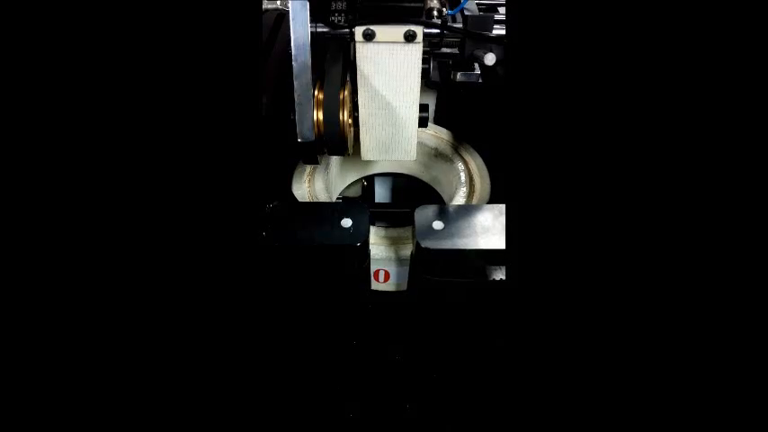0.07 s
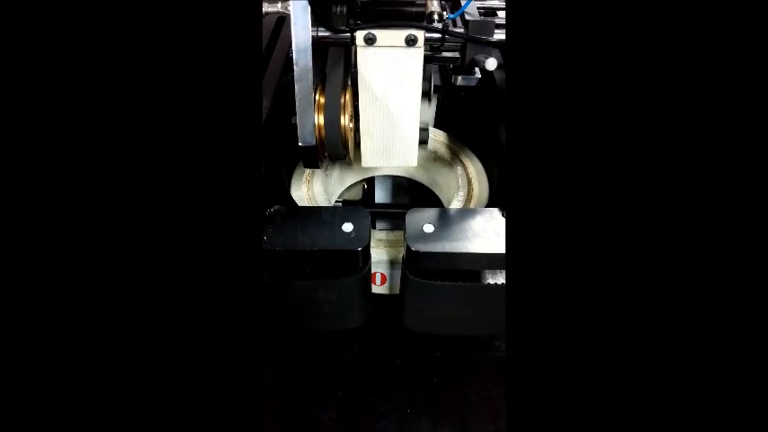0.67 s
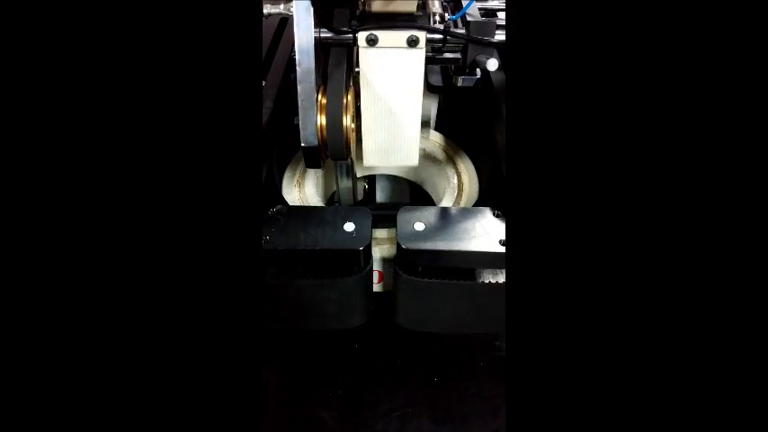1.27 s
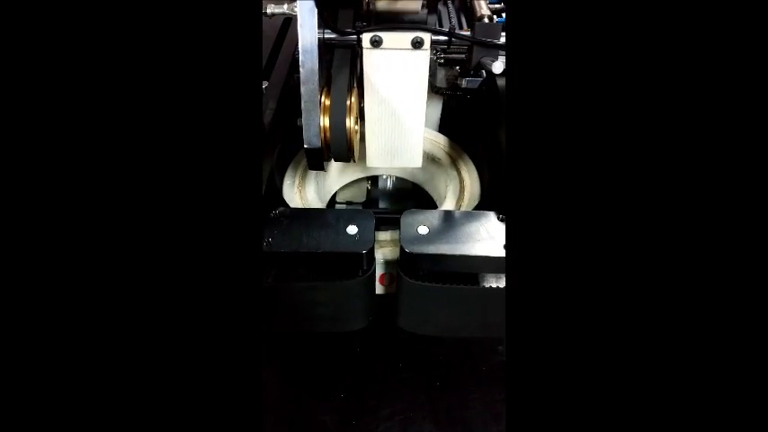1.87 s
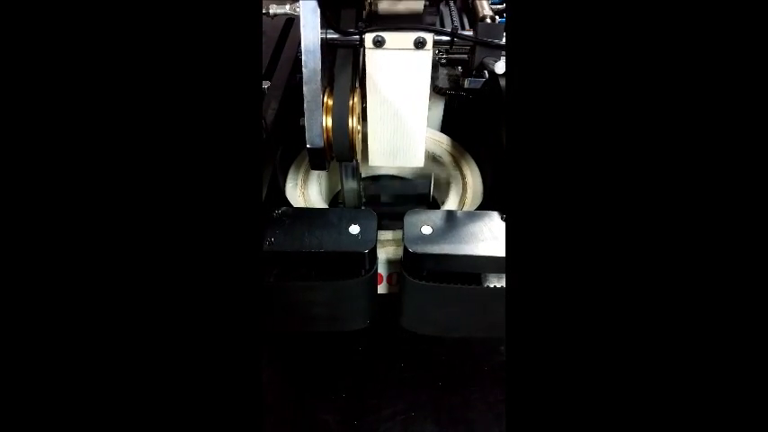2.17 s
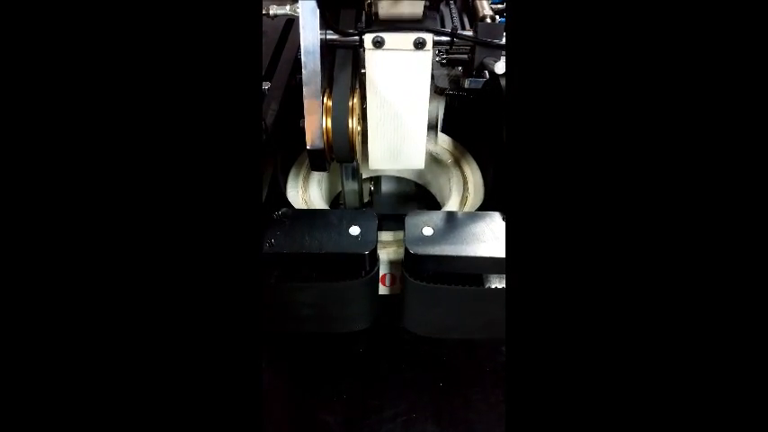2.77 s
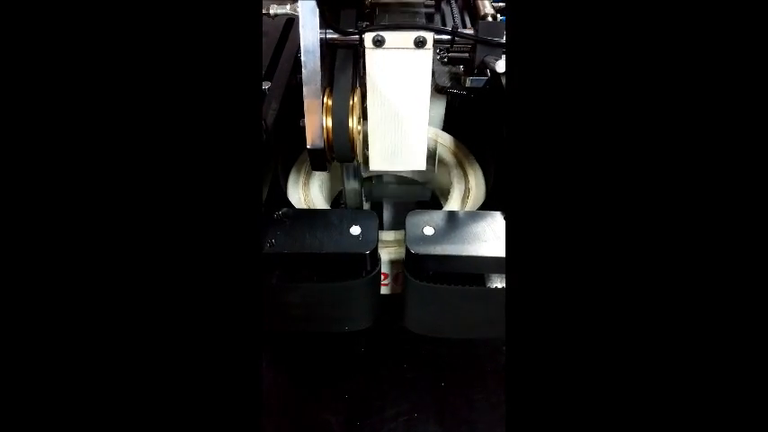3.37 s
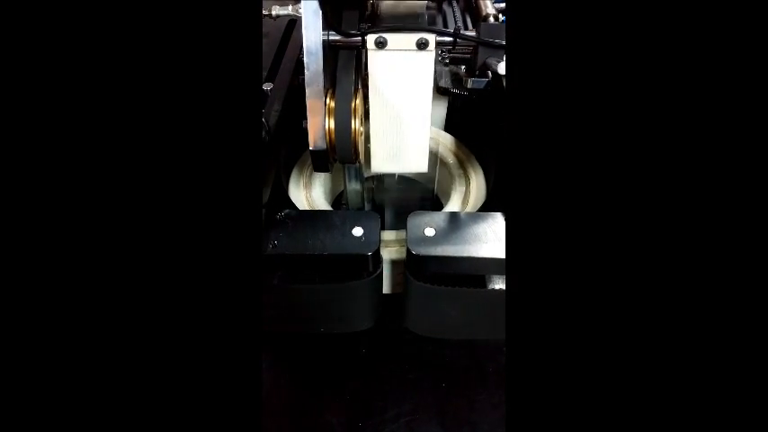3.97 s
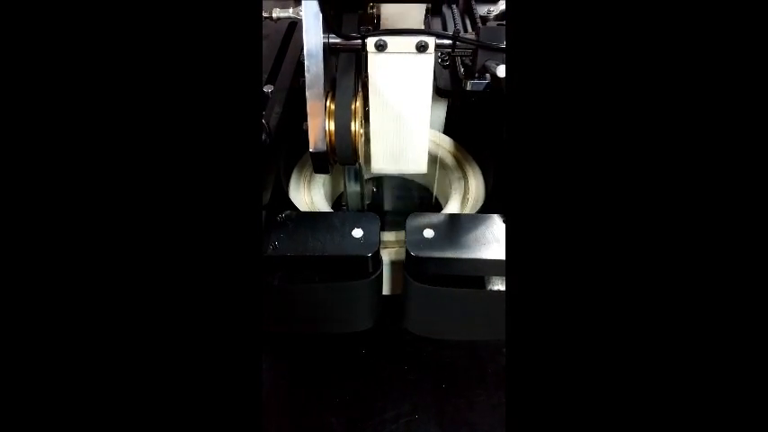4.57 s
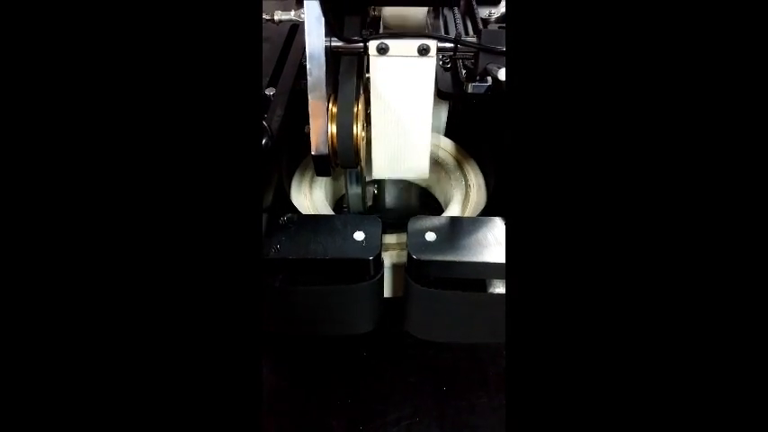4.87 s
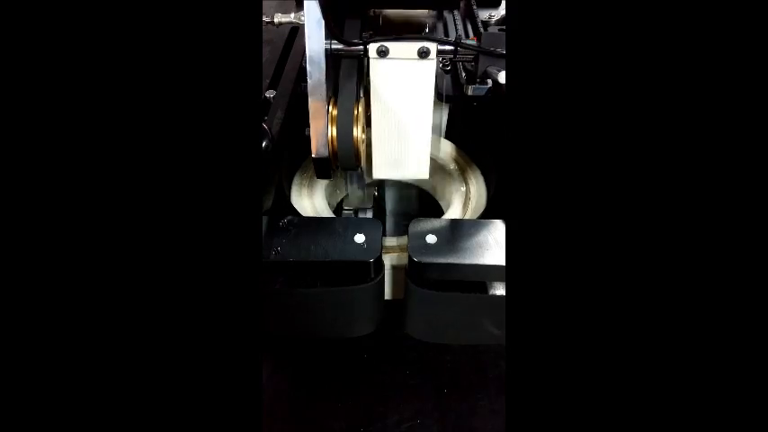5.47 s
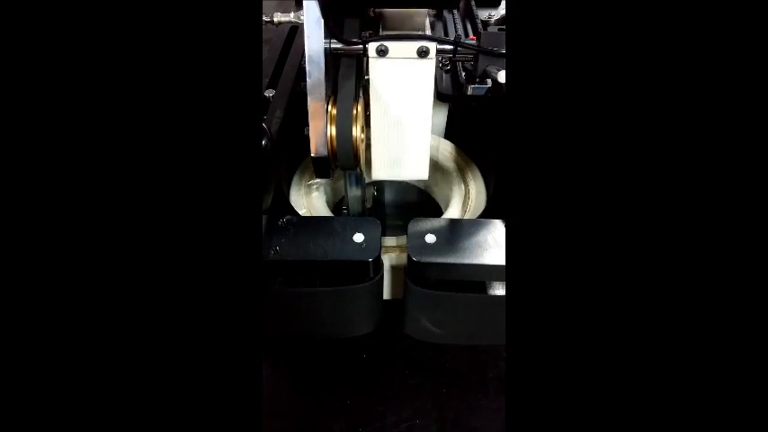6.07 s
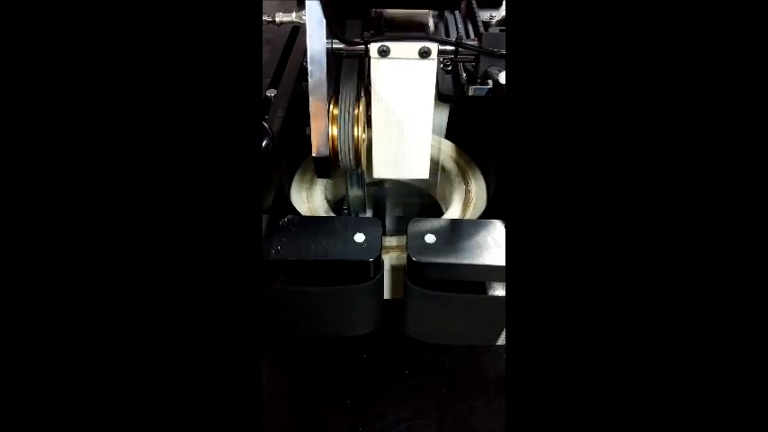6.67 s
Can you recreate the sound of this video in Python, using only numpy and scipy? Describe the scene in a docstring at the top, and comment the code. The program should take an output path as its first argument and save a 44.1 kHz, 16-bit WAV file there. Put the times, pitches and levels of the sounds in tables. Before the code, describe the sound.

Sticky tape peels in squealing bursts, then rasps steadily as a coil wrapping machine speeds up, rumbling and rattling.

```python
"""Tape peels off the reel of a coil wrapping machine, close by, as its glue sticks and slips: first in
squawking, crackling tugs, then, at speed, in a rasp that swells twice a turn. The shuttle ring that
pulls it runs on rollers, whose small impacts excite the modes of the ring, while the steel frame
rumbles and the sheet guards rattle. Behind them the motor hums, the pneumatics hiss faintly
and the hall reverberates with the sound of the tape."""
import sys
import numpy as np
from scipy import signal
from scipy.fft import rfft, irfft, next_fast_len
from scipy.io import wavfile
from scipy.ndimage import uniform_filter1d, map_coordinates

SR = 44100
rng = np.random.default_rng(int(sys.argv[2]) if len(sys.argv) > 2 else 0)


def unload_wav(signal):
    """Save mono or channel-first audio to the path in sys.argv[1] as 16-bit WAV at rate SR, clipped to [-1, 1]."""
    wavfile.write(
        sys.argv[1],
        SR,
        np.round(np.clip(np.atleast_2d(signal).T, -1, 1) * 32767).astype(np.int16),
    )


N = 296352
TIME = np.arange(N) / SR
START_S, TURN_S = 0.656, 0.388  # onset of the sound; period of the ring at full speed
TAPE_LAG_MS = 0.476  # the tape is heard on the left first
TUG_FALL_S = 0.075


def amp(db):
    """Decibels to amplitude ratio."""
    return 10 ** (np.asarray(db) / 20)


def unit(x):
    """Normalisation to rms 1."""
    return x / np.sqrt(np.mean(x ** 2) + 1e-20)


def along(points, hz):
    """Interpolation of (frequency, value) points on a logarithmic frequency axis."""
    freqs, values = np.transpose(points)
    return np.interp(np.log(hz + 1), np.log(freqs + 1), values)


def curves(rows, period=None):
    """Linear interpolation in time: one curve for each column after the first."""
    times, *columns = np.transpose(rows)
    return [np.interp(TIME, times, column, period=period) for column in columns]


def swells(rows, fall_s, late_s=0):
    """Trapezoidal envelopes, 0-1, one for each (time, rise, hold, ...) row."""
    t = TIME - late_s
    ramps = [np.minimum((t - s) / rise, 1 - (t - s - rise - hold) / fall_s) for s, rise, hold, *_ in rows]
    return np.clip(ramps, 0, 1)


def lifts(rows, fall_s, late_s=0):
    """Superposition of those envelopes, weighted by each column after the hold."""
    return np.transpose(rows)[3:] @ swells(rows, fall_s, late_s)


def wobble(rate):
    """Slow random modulation: a spline through rate knots a second."""
    return map_coordinates(rng.standard_normal(N // 8), [TIME * rate], mode="wrap")


def grains(rate, spread_db):
    """A Poisson process: rate tiny impulses a second, of scattered size and sign."""
    sizes = amp(spread_db * np.clip(rng.standard_normal(N), -2, 2)) * np.sign(rng.standard_normal(N))
    return sizes * (rng.random(N) < rate / SR)


def filtered(x, response):
    """Linear filtering: the spectrum of x times a frequency response."""
    size = 2 * next_fast_len(N // 2 + SR // 4)
    return irfft(rfft(x, size) * response(np.fft.rfftfreq(size, 1 / SR)), size)[..., :N]


def coloured(x, spectrum):
    """Minimum-phase filtering: folding the cepstrum makes the response causal."""
    def response(hz):
        cepstrum = irfft(np.log(amp(along(spectrum, hz))))
        cepstrum[1:len(cepstrum) // 2] *= 2
        cepstrum[len(cepstrum) // 2 + 1:] = 0
        return np.exp(rfft(cepstrum))
    return filtered(x, response)


def resonate(x, modes):
    """Modal superposition: (frequency, bandwidth, gain) resonators of alternating sign."""
    def response(hz):
        return sum((-1) ** k * amp(db) * 1j * hz * width / (centre ** 2 - hz ** 2 + 1j * hz * width)
                   for k, (centre, width, db) in enumerate(modes))
    return filtered(x, response)


def steadied(x, seconds):
    """Division by the running rms evens out the swells of a texture and leaves its grain."""
    power = np.abs(uniform_filter1d(np.mean(unit(x) ** 2, axis=0), int(seconds * SR)))
    return unit(x / np.sqrt(power + 0.017))


def lagged(x, lag_ms):
    """Interaural delay: the sound reaches the right side after the left."""
    return np.array([x, np.roll(x, round(lag_ms * SR / 1000))])


def panned(pair, pan_db):
    """Level panning: the left side stands pan_db above the right."""
    return pair * amp([[pan_db / 2], [-pan_db / 2]])


def spread(make, lag_ms, apart_db, pan_db):
    """Partial coherence of a wide source: one common signal plus an independent one on each side."""
    common = lagged(make(), lag_ms)
    return panned(common + amp(apart_db) * np.array([make(), make()]), pan_db)


def scattered(clicks, pan_db, scatter_db, t60):
    """Scattering by the moving machine: each click of the tape trails a fresh splash of noise."""
    decay = amp(-120 * np.arange(SR // 12) / SR / t60)  # of power, hence 120
    power = np.abs(signal.fftconvolve(clicks ** 2, decay / decay.sum())[:N])
    splash = np.sqrt(power) * rng.standard_normal((3, N))
    direct = lagged(clicks + splash[2], TAPE_LAG_MS)
    return panned(direct + amp(scatter_db) * splash[:2], pan_db)


# The ring settles into even turns: (time [s], modulation depth [0-1])
EVENNESS = [(3.95, 0), (4.3, 0.7)]
# One even turn: (time into the turn [s], tape pull [dB], guards [dB], rollers [dB], motor load [dB])
TURN_CYCLE = [(.03, 1.5, 0, 3, -10), (.115, 4, 3.5, -1, 6), (0.182, -1.5, -1.5, 3.9, -4),
              (.23, 6.5, 7, -2.5, 1.5), (.27, 3.5, 2, -1, 2), (.32, 0, -12.5, 3.5, -11.5),
              (.37, 0.5, 2, 1, -3.5)]
def turn_db(part):
    """Periodic modulation: each turn draws the tape gently, then hard; the rollers run freest between."""
    swings = dict(zip(["pull", "guards", "rollers", "motor"], curves(TURN_CYCLE, TURN_S)))
    return curves(EVENNESS)[0] * swings[part]


# Lurches of the ring: (time [s], rise [s], hold [s], then the lift of
# rumble [dB], rollers [dB], guards [dB], rasp [dB], crackle [dB])
RING_LURCHES = [(1.0, 0.021, 0.02, 5, -0.5, 6.5, 2, 0), (1.15, 0.053, 0.018, 10.5, -1.5, 1, 0.5, -3),
                (1.54, 0.034, 0.046, 10, 1.5, -1, 4.5, 11), (1.9, 0.015, 0.061, 5.5, 0.5, 7, 1.5, 2),
                (2.1, 0.017, 0.018, -2, 2.5, 7.5, 3.5, -1), (2.38, .02, 0.018, 2, 4, 6, 4.5, 3.5),
                (3.445, .015, 0.033, 10.5, 2.5, 1, 0.5, 10), (3.66, 0.033, 0.026, 4, 0, 5.5, -0.5, -0.5),
                (3.87, 0.02, .03, 5, 2, 5.5, 1.5, -2.5), (4.5, .02, 0.019, 6, -0.5, 0, 1, 2),
                (4.82, .03, 0.026, 9, -0.5, 1.5, -1.5, -0.5), (5.49, 0.026, 0.028, 4, -0.5, 1.5, 1.5, -1.5)]
def lurch_db(part):
    """Common modulation: a lurch of the ring briefly shifts the levels of several parts together."""
    column = ["rumble", "rollers", "guards", "rasp", "crackle"].index(part)
    return lifts(RING_LURCHES, fall_s=0.057)[column]


# Tugs on the tape: (time [s], rise [s], hold [s], rasp lift [dB], crackle lift [dB], slip lift [dB],
# guard lift [dB], rumble drop [dB], roller drop [dB], squawk level [dB])
TAPE_TUGS = [(1.234, .012, 0.12, 11.5, 6, 17.5, 9, 7, 0.5, -20.5),
             (1.675, .02, .2, 6.5, 7, 15, 4, 3, 0.5, -20.5), (2.6, .13, .09, 8, 5, 13.5, 10, 0, 0.5, -20.5),
             (3.89, 0.048, 0.12, 2.5, 3.5, 3.5, 4.5, 0.5, 6.5, -19.5)]
def tug_db(part, late_s=0):
    """Transient loading: a tug makes the peeling louder and holds the ring back."""
    column = ["rasp", "crackle", "slip", "guards", "rumble", "rollers"].index(part)
    return lifts(TAPE_TUGS, TUG_FALL_S, late_s)[column]


# The tape creeps off the reel, then runs freely: (time [s], relative rasp [dB], relative crackle [dB])
TAPE_FEED = [(.66, -34.5, -35), (.85, -35, -36.5), (1.0, -31.5, -30.5), (1.22, -35, -34.5),
             (1.5, -34, -35.5), (1.66, -30, -36.5), (2.05, -33, -34), (2.28, -34, -34.5),
             (2.88, -32.5, -32), (3.04, -31, -30), (3.2, -33, -33.5), (3.41, -36.5, -32),
             (3.48, -26, -32.5), (3.76, -25.5, -27), (3.86, -30, -27.5), (4.15, -26, -24.5),
             (5.15, -25, -25), (6.72, -26, -29)]
def peel_db():
    """Gains add in decibels: feed, tugs, lurches and turns set the rasp and the crackle."""
    rasp_db, crackle_db = curves(TAPE_FEED)
    rasp_db += tug_db("rasp") + lurch_db("rasp") + turn_db("pull")
    crackle_db += tug_db("crackle") + lurch_db("crackle") + 0.083 * turn_db("pull")
    return rasp_db, crackle_db


# Decay of the hall: (frequency [Hz], reverberation time [s])
HALL_T60 = [(150, 0.38), (1500, 0.59), (6000, 0.089), (15000, 0.05)]
def hall(x):
    """Reverberation: convolution with noise that decays exponentially, each band at its own rate."""
    hz, t, noise = signal.stft(rng.standard_normal((2, SR // 2)), SR, nperseg=256)
    decay = amp(-60 * t / along(HALL_T60, hz)[:, None])
    tail = signal.istft(noise * decay, SR, nperseg=256)[1]
    return signal.fftconvolve(x, tail / np.linalg.norm(tail[0]), axes=1)[:, :N]


# Resonances of the air outlet: (frequency [Hz], bandwidth [Hz], gain [dB])
OUTLET_MODES = [(3620, 100, -2.5), (3900, 580, -4.5), (6680, 89, 1), (6800, 260, -21), (6900, 630, -3.5)]
# Puffs of escaping air: (time [s], rise [s], hold [s], lift [dB])
AIR_PUFFS = [(.64, 0.014, .03, 18), (.85, 0.067, 0.062, 21.5), (1.56, 0.043, .02, 22.5),
             (2.9, .06, .05, 14), (3.25, 0.1, .03, 15)]
# Spectrum of the valve's spit: (frequency [Hz], gain [dB])
SPIT_SPECTRUM = [(4000, -30), (6800, -15), (8300, 2), (8900, -9), (10000, -5), (12500, -10), (16000, -12)]
def air():
    """Jet noise: a leak hisses through the outlet's resonances, and a switching valve spits once."""
    leak_db = -47.5 + lifts(AIR_PUFFS, fall_s=0.31)[0]
    hiss = amp(leak_db) * unit(resonate(rng.standard_normal((2, N)), OUTLET_MODES))
    age = TIME - 1.043
    burst = amp(-10.5 - 60 * np.abs(age) / 0.028)
    tail = amp(-20.5 - 60 * np.abs(age) / 0.26)
    spit = unit(coloured(rng.standard_normal((2, N)), SPIT_SPECTRUM))
    return hiss + (age > 0) * (burst + tail) * spit


# Band of the whine: (frequency [Hz], bandwidth [Hz], gain [dB])
WHINE_BAND = [(3490, 83, 0)]
# Its swell: (time [s], rise [s], hold [s], level [dB])
WHINE_ENVELOPE = [(2.8, .15, .45, -41)]
def whine():
    """Narrow-band noise is heard as a pitch: a thin whine in the lull before the ring speeds up."""
    level = amp(np.transpose(WHINE_ENVELOPE)[-1]) @ swells(WHINE_ENVELOPE, fall_s=0.31)
    return level * unit(resonate(rng.standard_normal((2, N)), WHINE_BAND))


# Partials of the motor's hum: (frequency [Hz], relative level [dB])
HUM_PARTIALS = [(59.3, -10), (119, -0.5), (240.5, -3), (356, -6.5)]
# The motor takes up its load: (time [s], relative level [dB])
MOTOR_LOAD = [(.66, -32), (.73, -40), (.78, -27), (.97, -16.5), (1.2, -32), (1.57, -22.5), (1.85, -27.5),
              (2.2, -20), (2.6, -32), (2.9, -25), (3.3, -22), (3.62, -24), (3.8, -18), (4.0, -27),
              (4.3, -22.5), (6.72, -22)]
def motor():
    """A line spectrum: near-harmonic partials waver in level and phase and swell with the load."""
    hum = np.zeros(N)
    for hz, db in HUM_PARTIALS:
        peak = np.sqrt(2) * amp(db + 0.67 * wobble(9.6))
        hum += peak * np.sin(2 * np.pi * hz * TIME + 0.97 * wobble(12))
    return amp(curves(MOTOR_LOAD)[0] + turn_db("motor") - 0.5) * hum


# Response of the steel frame: (frequency [Hz], gain [dB])
FRAME_SPECTRUM = [(15, -13), (30, -33), (42, -16), (56, -9.5), (95, -7.5), (160, -15.5), (260, -13.5),
                  (600, -51)]
def frame():
    """Structure-borne sound: random contacts shake the frame into a low rumble."""
    shake = spread(lambda: grains(900, 6.4), lag_ms=0.13, apart_db=-11, pan_db=0)
    level_db = -26 + lurch_db("rumble") - tug_db("rumble")
    return amp(level_db) * steadied(coloured(shake, FRAME_SPECTRUM), 0.1)


# Resonances of the sheet guards: (frequency [Hz], bandwidth [Hz], gain [dB])
GUARD_MODES = [(563, 107, -2.5), (630, 40, 1), (648, 17.6, 3), (763, 71, 2.5), (868, 59, -6.5)]
def guards():
    """Forced vibration of plates: the guards rattle with the pull of the tape, just after each tug."""
    rattle = spread(lambda: grains(1500, 3.4), lag_ms=0.17, apart_db=-13, pan_db=-0.5)
    feed_db = curves(TAPE_FEED)[0] + 25  # relative to full speed
    pulled_db = 1.21 * feed_db + tug_db("guards", late_s=0.012)
    spin_up_db = np.interp(TIME, [START_S, START_S + 0.4], [-5, 0])
    level_db = -21.5 + pulled_db + lurch_db("guards") + turn_db("guards") + spin_up_db
    return amp(level_db) * steadied(resonate(rattle, GUARD_MODES), 0.068)


# Bending resonances of the ring: (frequency [Hz], bandwidth [Hz], gain [dB])
RING_BENDING_MODES = [(217.8, 49.5, -0.5), (245.2, 36, 2)]
# Its higher resonances: (frequency [Hz], bandwidth [Hz], gain [dB])
RING_UPPER_MODES = [(312.2, 30, -3.5), (354, 20, -1), (398, 32, -4.5), (484, 16, -4)]
# Spectrum of the rolling: (frequency [Hz], gain [dB])
ROLLING_SPECTRUM = [(70, -36), (130, -3), (175, -6), (215, -2.5), (400, -0.5), (500, -8.5), (800, -16.5),
                    (2000, -60)]
# The ring gathers speed: (time [s], relative level [dB])
ROLLING_LEVEL = [(.66, -31.5), (.8, -26.5), (.98, -15.5), (1.14, -16), (1.22, -19.5), (1.53, -15),
                 (1.7, -20), (2.05, -19.5), (2.25, -17.5), (2.5, -17.5), (3.05, -18), (3.17, -14),
                 (3.38, -20.5), (3.55, -17), (3.88, -13), (4.02, -13), (4.27, -12), (6.72, -14)]
def rollers():
    """Rolling contact: the rollers' patter excites the ring, its upper modes more as it rolls harder."""
    level_db = curves(ROLLING_LEVEL)[0] + lurch_db("rollers") + turn_db("rollers") - tug_db("rollers")
    patter = spread(lambda: grains(700, 2.9), lag_ms=0.31, apart_db=-17.5, pan_db=0)
    contacts = spread(lambda: grains(1500, 4.7), lag_ms=0.29, apart_db=-12.5, pan_db=3)
    bending = unit(resonate(patter, RING_BENDING_MODES))
    upper = amp(0.061 * (level_db + 12)) * unit(resonate(patter, RING_UPPER_MODES))
    ringing = unit(coloured(bending + upper, ROLLING_SPECTRUM))
    broadband = amp(-5.5) * unit(coloured(contacts, ROLLING_SPECTRUM))
    return amp(level_db - 1) * steadied(ringing + broadband, 0.052)


# The ring sings at speed: (time [s], level [dB])
DRONE_LEVEL = [(3.9, -60), (4.3, -35), (6.1, -23), (6.3, -16), (6.72, -18.5)]
def drone():
    """Resonance: at full speed the rollers drive one mode of the ring until it sings, unsteadily."""
    mode = [(397, 20, 0)]
    singing = spread(lambda: resonate(resonate(grains(550, 2.4), mode), mode),
                     lag_ms=0.12, apart_db=-15, pan_db=0.5)
    return amp(curves(DRONE_LEVEL)[0]) * steadied(singing, 0.015)


# The ring bumps in its guides: (time [s], relative blow level [dB], clack level [dB])
RING_KNOCKS = [(1.083, -11, -45), (1.508, -14.5, -50), (1.567, -15, -42), (2.126, -19, -22),
               (2.205, -19, -45), (2.392, -18, -42), (2.408, -16, -20), (2.57, -10, -37),
               (3.426, -10.5, -16), (3.454, -15, -35), (5.354, -16, -45)]
# Low-pass action of the padded guides: (frequency [Hz], gain [dB])
PAD_SPECTRUM = [(300, -1.5), (600, -7), (1200, -17), (4000, -40)]
def knocks():
    """Impact excitation: each bump gives a dull thud through the frame and a short steel clack."""
    blows, clack_level = np.zeros((2, N))
    for s, blow_db, clack_db in RING_KNOCKS:
        blows[round(s * SR)] = amp(blow_db)
        clack_level += (TIME > s) * amp(clack_db - 60 * np.abs(TIME - s) / 0.062)
    thud_modes = [(70, 22, -16), (127, 150, 1.5), (273, 91, 19), (700, 600, -53)]
    clack_modes = [(1200, 600, 3), (2510, 660, 4), (3770, 910, -3)]
    thud = coloured(resonate(blows, thud_modes), PAD_SPECTRUM)
    clack = unit(resonate(rng.standard_normal((2, N)), clack_modes))
    return amp(36.5) * thud + clack_level * clack


# Resonances of tape dragged over the coil: (frequency [Hz], bandwidth [Hz], gain [dB])
SCRAPE_MODES = [(2080, 400, -1), (2760, 200, 3), (3840, 460, -2)]
def scrape():
    """Sliding friction: at speed, the hard pull of each turn drags the tape over the coil."""
    rubbing = spread(lambda: resonate(grains(2500, 4.5), SCRAPE_MODES), lag_ms=0.29, apart_db=0, pan_db=6)
    level_db = -38 + 4.4 * turn_db("pull") + 3.9 * wobble(30)  # grows faster than the pull
    return curves(EVENNESS)[0] * amp(level_db) * unit(rubbing)


# Spectrum of the finest ticks: (frequency [Hz], gain [dB])
SIZZLE_SPECTRUM = [(6000, -26), (9500, -31), (12000, 5), (14500, 6), (16000, -3)]
def sizzle():
    """Shot noise: a fine, very bright sizzle of ticks, strongest early and fading toward the end."""
    slips_per_s, _ = stick_slip()
    _, crackle_db = peel_db()
    fade_db = 6 * (slips_per_s / 300) ** 4
    ticks = spread(lambda: grains(2500, 4), lag_ms=TAPE_LAG_MS, apart_db=7, pan_db=3)
    return amp(crackle_db - 10.5 - fade_db) * unit(coloured(ticks, SIZZLE_SPECTRUM))


# Squeals of the stretching tape:
# (time [s], duration [s], first pitch [Hz], middle pitch [Hz], last pitch [Hz], relative level [dB])
TAPE_SQUEALS = [(1.229, .1, 1516, 1595, 1450, -17.5), (1.234, 0.019, 785, 795, 805, -15.5),
                (1.29, 0.13, 819, 870, 855, -15), (1.336, 0.077, 1585, 1600, 1520, -33),
                (1.688, .05, 1520, 1630, 1860, -16.5), (1.705, .045, 1256, 1480, 1620, -13.5),
                (1.73, 0.065, 1825, 1970, 2100, -26), (1.753, 0.068, 1510, 1565, 1440, -20),
                (1.785, .075, 2144, 2255, 1980, -25), (1.85, 0.037, 1610, 1547, 1480, -17.5),
                (2.72, 0.057, 1545, 1495, 1450, -23)]
def squeals():
    """Frequency locking: slips in step with the span give a tone whose pitch arches with the tension."""
    voice = np.zeros(N)
    flutter_db, jitter = 1.6 * wobble(150), 0.42 * wobble(220)
    for s, length, *arch_hz, db in TAPE_SQUEALS:
        at = np.arange(round(s * SR), round((s + length) * SR))
        progress = np.linspace(0, 1, len(at))
        pitch_hz = np.polyval(np.polyfit([0, 0.5, 1], arch_hz, 2), progress)
        phase = 2 * np.pi * np.cumsum(pitch_hz) / SR + jitter[at]
        swell = np.sqrt(2 * np.abs(np.sin(np.pi * progress)))
        voice[at] += swell * amp(db + flutter_db[at]) * np.sin(phase)
    return lagged(voice, TAPE_LAG_MS)


# Resonances of the taut span of tape: (frequency [Hz], bandwidth [Hz], gain [dB])
SPAN_MODES = [(814, 96, -1.5), (1540, 130, -5.5), (2150, 120, -7)]
def squawks():
    """Modes of a stretched strip: in each tug the breaking glue rings the span of tape."""
    strength = amp(np.transpose(TAPE_TUGS)[-1]) @ swells(TAPE_TUGS, TUG_FALL_S) ** 2
    ringing = spread(lambda: resonate(grains(1500, 0.88), SPAN_MODES),
                     lag_ms=TAPE_LAG_MS, apart_db=-10.5, pan_db=-4.5)
    return strength * steadied(ringing, 0.011)


# The loudest snaps of the tape: (time [s], relative level [dB])
LOUD_SNAPS = [(1.2457, -13), (1.2844, -11.5), (1.318, -10), (1.3994, -17), (1.4276, -16.5), (1.682, -11),
              (1.743, -17), (1.783, -9.5), (2.4483, -17.5), (2.4944, -13.5), (2.5184, -21), (2.5284, -11),
              (2.559, -13.5), (2.58, -10), (2.5987, -12), (2.6194, -7.5), (2.6505, -10), (2.6824, -9.5),
              (2.7608, -22), (2.7917, -15), (2.8795, -23), (2.9169, -21), (3.466, -9.5), (3.5734, -12),
              (3.6053, -12), (3.633, -11), (3.7437, -13.5), (4.1518, -8), (4.191, -10.5), (4.2388, -12),
              (4.426, -12), (4.5432, -11), (4.6156, -14), (4.9074, -12.5), (5.016, -11), (5.2349, -12.5),
              (5.296, -12), (5.321, -11), (5.4063, -11.5), (5.443, -12.5), (5.594, -12.5), (5.7116, -12.5),
              (5.7938, -8.5), (5.868, -14), (5.983, -9), (6.075, -15), (6.1, -11), (6.146, -18),
              (6.184, -14), (6.3731, -13.5), (6.466, -15), (6.5122, -14), (6.5746, -8.5)]
# Spectrum of a snap: (frequency [Hz], gain [dB])
SNAP_SPECTRUM = [(2000, -40.5), (4200, -0.5), (6000, 1), (8500, -2.5), (12000, -6.5), (16000, -17)]
def snaps():
    """Impulsive release: larger patches of glue let go at once, each a bright click with a dull body."""
    _, crackle_db = curves(TAPE_FEED)
    clicks = grains(rate=6.4, spread_db=1) * amp(crackle_db + 11.5)  # lesser snaps come at random
    for s, db in LOUD_SNAPS:
        clicks[round(s * SR)] += amp(db)
    splash = scattered(clicks, pan_db=6, scatter_db=12, t60=0.02)
    return amp(12) * coloured(splash, SNAP_SPECTRUM) + amp(-27.5) * coloured(splash, RASP_SPECTRUM)


# How the glue lets go: (time [s], slip rate [1/s], relative slip level [dB])
GLUE_SLIPS = [(.66, 59.2, -13.5), (3.4, 48.8, -8), (3.6, 103, 4.5), (4.05, 167, -7.5), (4.4, 238, -7.5),
              (6.7, 370, -11)]
def stick_slip(tug_slips_per_s=132):
    """Relaxation oscillation: rate and level of the slips; a tug hardens them and imposes its rate."""
    rate, slip_db = curves(GLUE_SLIPS)
    taut = swells(TAPE_TUGS, TUG_FALL_S).sum(axis=0)
    return rate + taut * (tug_slips_per_s - rate), slip_db + tug_db("slip")


# Spectrum of the mid-range rasp: (frequency [Hz], gain [dB])
RASP_SPECTRUM = [(350, -31.5), (600, 0.5), (900, 4.5), (1150, 5), (1550, 2.5), (1850, 1), (2200, 0.5),
                 (3000, -1), (4200, -3), (5500, -12), (9000, -27)]
# Spectrum of the bright crackle: (frequency [Hz], gain [dB])
CRACKLE_SPECTRUM = [(1200, -27), (3000, -5), (4500, 2.5), (6100, 4.5), (8000, 2), (10000, 1), (12500, -5),
                    (14000, -23), (16000, -27)]
def tape():
    """Adhesive fracture: glue strands break in a dense rasp and crackle, bunched by stick and slip."""
    rasp_db, crackle_db = peel_db()
    rate, slip_db = stick_slip()
    uneven_rate = rate * np.exp(0.35 * wobble(110))
    slip_count = np.floor(np.cumsum(uneven_rate) / SR)
    sizes = amp(3 * np.clip(rng.standard_normal(N), -2, 2)) * np.sqrt(SR / rate)  # power stays even
    slips = np.diff(slip_count, prepend=0) * sizes
    cracks = scattered(slips, pan_db=2, scatter_db=-6.5, t60=0.0098)
    strands = spread(lambda: grains(2500, 4.3), lag_ms=TAPE_LAG_MS, apart_db=17, pan_db=1)
    fibres = spread(lambda: grains(5000, 6.4), lag_ms=TAPE_LAG_MS, apart_db=31, pan_db=5)
    flutter = amp(2.25 * wobble(45))
    rasp = flutter * unit(coloured(strands, RASP_SPECTRUM))
    rasp += amp(slip_db - 3.5) * unit(coloured(cracks, RASP_SPECTRUM))
    crackle = flutter * unit(coloured(fibres, CRACKLE_SPECTRUM))
    crackle += amp(slip_db + 2) * unit(coloured(cracks, SNAP_SPECTRUM))
    return amp(rasp_db + 5.5) * steadied(rasp, 0.053) + amp(crackle_db + 0.5) * crackle


# Left-right balance of the tape's sound: (frequency [Hz], left over right [dB])
TAPE_STEREO_BALANCE = [(700, -0.5), (1250, -4), (2300, 1.3), (4400, -1.5), (8000, -0.5), (14000, -2)]
def scene():
    """Superposition: the machine, the sound of the tape and its reverberation add."""
    peeling = tape() + sizzle() + snaps() + squawks() + squeals() + scrape()
    peeling = filtered(peeling, lambda hz: amp(np.outer([0.5, -0.5], along(TAPE_STEREO_BALANCE, hz))))
    machine = motor() + frame() + rollers() + guards() + drone() + knocks() + air() + whine()
    return machine + peeling + amp(-16) * hall(peeling)


def record(dry, top_hz=15900):
    """Gating, soft clipping and band limiting: an abrupt onset, rounded peaks, no extreme treble."""
    gated = dry * np.clip((TIME - START_S) / 0.002, 0, 1)
    rounded = gated / (1 + gated ** 8) ** (1 / 8)
    return filtered(rounded, lambda hz: hz < top_hz)


dry = scene()
out = record(dry)
unload_wav(out)
```